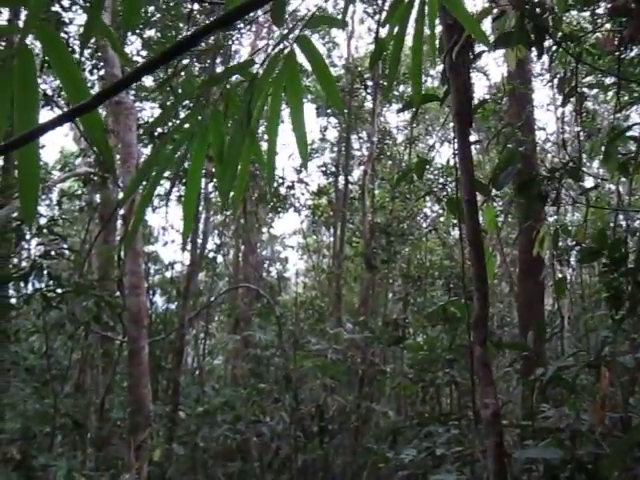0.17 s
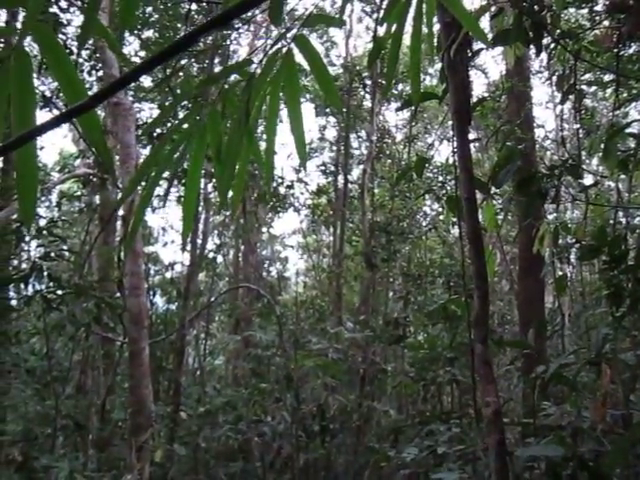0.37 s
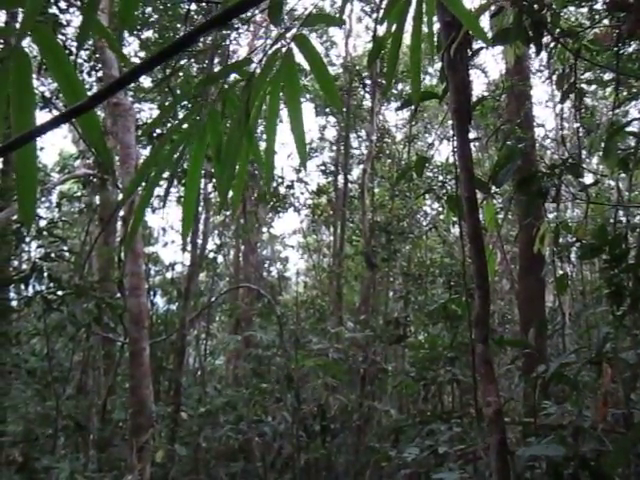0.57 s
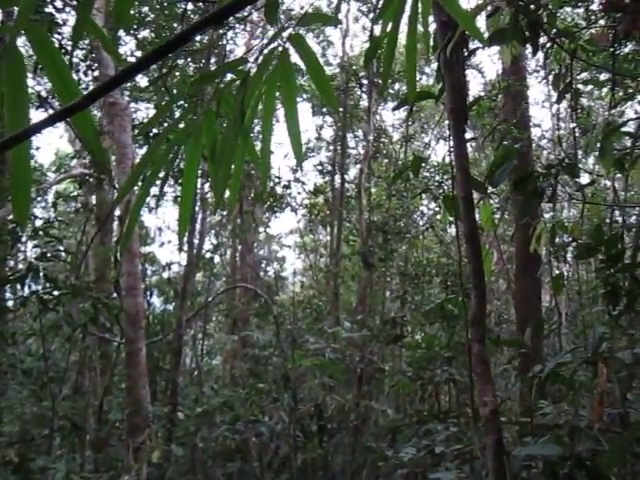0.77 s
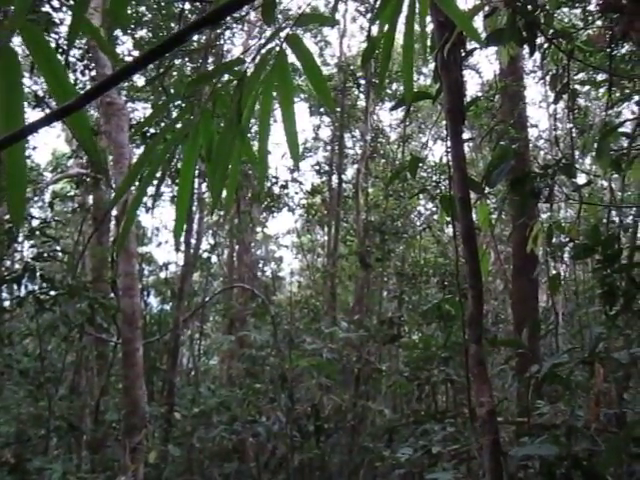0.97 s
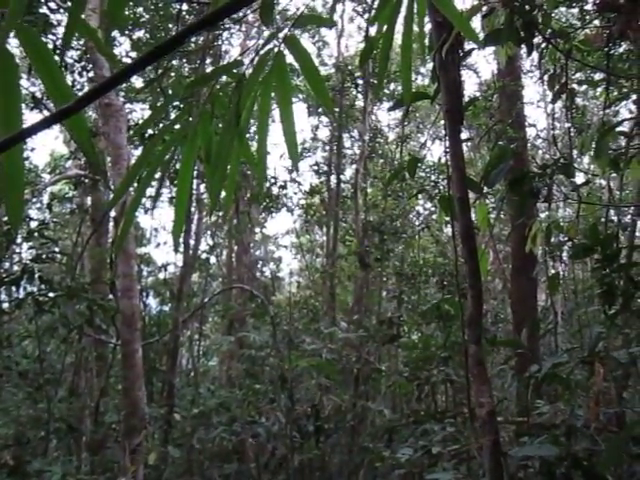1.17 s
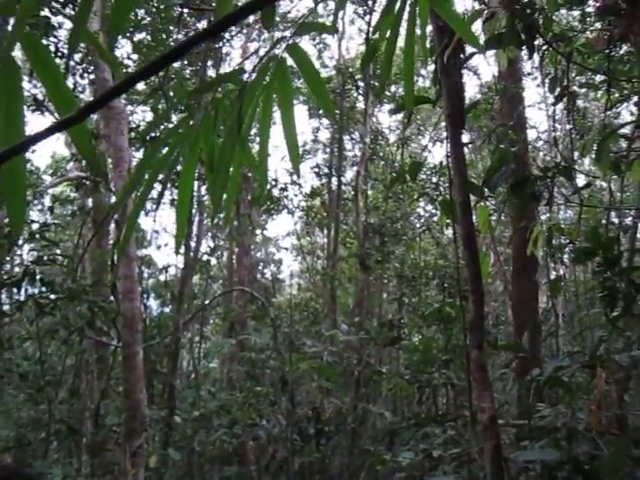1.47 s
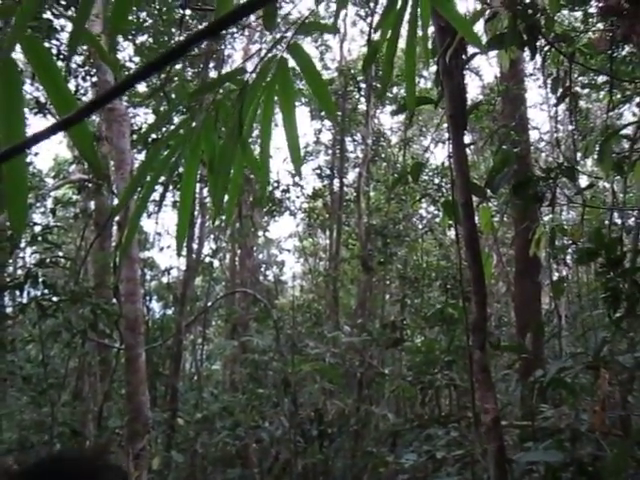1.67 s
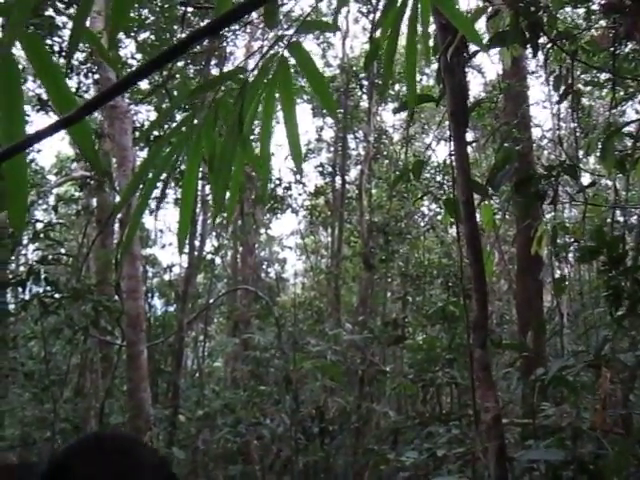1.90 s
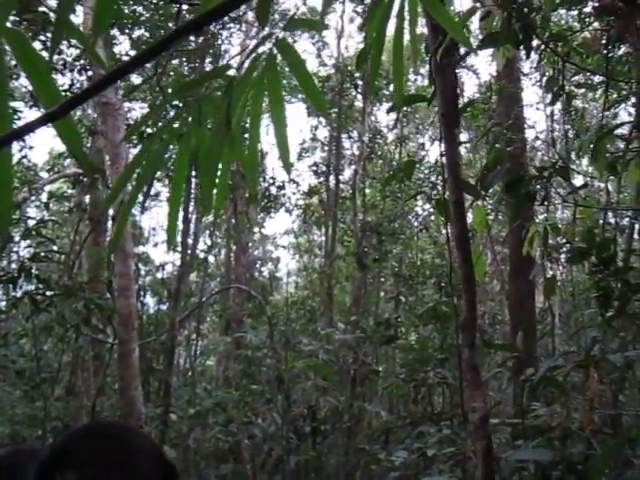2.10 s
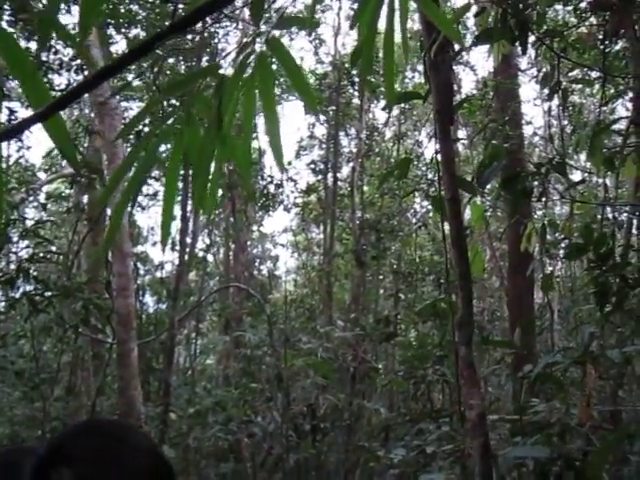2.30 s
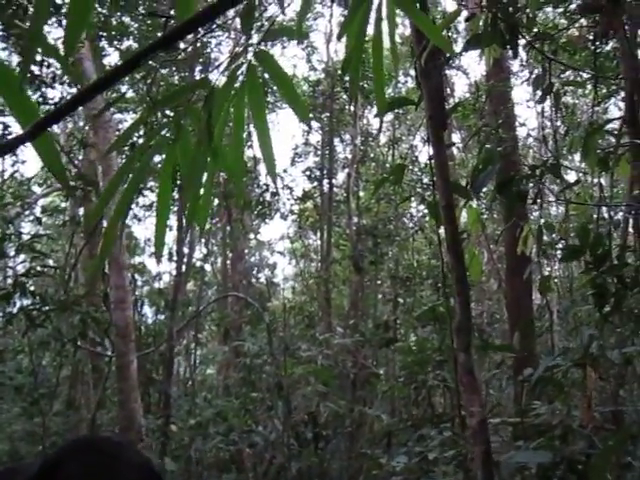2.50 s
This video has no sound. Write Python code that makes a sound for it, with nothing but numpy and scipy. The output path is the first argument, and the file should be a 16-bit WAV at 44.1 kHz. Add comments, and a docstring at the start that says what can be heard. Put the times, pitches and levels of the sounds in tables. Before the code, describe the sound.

A gibbon whoops repeatedly in a tropical forest while nearby leaves rustle and twigs crackle.

```python
"""Gibbon whooping in a tropical forest

A gibbon whoops again and again: each near-pure note slides up, holds, and rings on as the trunks
scatter it. Far whistles answer and insects hiss in narrow bands of noise. Close by, leaves rustle
with many tiny contacts, twigs crackle, and wood and ground give soft, quickly damped knocks.
Under it all lies a low rumble of air."""
import sys
import numpy as np
from scipy import signal
from scipy.fft import rfft, irfft
from scipy.io import wavfile
from scipy.ndimage import uniform_filter1d

SR = 44100
rng = np.random.default_rng(int(sys.argv[2]) if len(sys.argv) > 2 else 0)


def int16_out(signal):
    """Quantize to a 16-bit WAV file."""
    q = np.round(np.clip(np.atleast_2d(signal).T, -1, 1) * 32767)
    wavfile.write(sys.argv[1], SR, q.astype(np.int16))


N = 116865


def undb(db):
    """Amplitude ratio of a level in decibels."""
    return 10 ** (np.asarray(db) / 20)


def unit(x):
    """Normalisation to rms 1."""
    return x / np.sqrt(np.mean(x ** 2) + 1e-18)


def ramp(u):
    """Raised-cosine step from 0 to 1."""
    return np.sin(np.clip(u, 0, 1) * np.pi / 2) ** 2


def add(out, x, start):
    """Superposition: x joins out at a start time in seconds."""
    i = int(round(start * SR))
    x, i = x[max(-i, 0):], max(i, 0)
    out[i:i + len(x)] += x[:max(len(out) - i, 0)]


def colour(x, points):
    """Spectral shaping: x is filtered by a curve of (Hz, dB) points, at rms 1."""
    hz, db = np.array(points).T
    f = np.fft.rfftfreq(len(x), 1 / SR)
    gain = undb(np.interp(np.log(f + 1), np.log(hz), db))
    return unit(irfft(rfft(x) * gain, len(x)))


def band(size, hz, width_hz):
    """Resonance: white noise through one steep peak, at rms 1."""
    f = np.fft.rfftfreq(size, 1 / SR) + 1
    detuning = (f - hz * hz / f) / width_hz
    return unit(irfft(rfft(rng.standard_normal(size)) / (1 + detuning ** 2), size))


def forest(x, echo_db, early_t60_s=0.66, late_t60_s=1.99, slap_s=0.135, smooth_s=0.14):
    """Reverberation by scattering: near trunks return a short decay, far ones a long tail."""
    t = np.arange(len(x)) / SR
    early, late = undb(4.5 - 60 * t / early_t60_s), undb(-60 * t / late_t60_s)
    slap = undb(2.5) * np.exp(-((t - slap_s) / 0.008) ** 2)  # stronger return from a stand of trees
    decay = (early + late) * ramp(t / 0.013) + slap
    decay = undb(echo_db) * decay / np.linalg.norm(decay)
    heard = x + signal.fftconvolve(x, rng.standard_normal(len(x)) * decay)[:len(x)]
    # The quick flutter stays, while the smoothed power follows an even decay.
    even_power = x ** 2 + signal.fftconvolve(x ** 2, decay ** 2)[:len(x)]
    smooth = lambda p: np.abs(uniform_filter1d(p, int(smooth_s * SR), mode="constant")) + 1e-12
    return unit(heard * np.sqrt(smooth(even_power) / smooth(heard ** 2))) * x.std()


# Spectrum of the air (frequency [Hz], relative spectral level [dB])
AIR_SPECTRUM = [(15, -0.5), (30, -2), (60, -6), (120, -12.5), (220, -17), (500, -22.5), (900, -23.5),
                (2000, -28), (3000, -28.5), (4500, -32), (6500, -38.5), (10000, -40.5), (13000, -45.5),
                (16000, -52.5)]


def air(level_db=-48):
    """Broadband ambient noise: a low rumble falling away into the even hiss of the forest."""
    return undb(level_db) * colour(rng.standard_normal(N), AIR_SPECTRUM)


# Insect buzzes (start [s], duration [s], centre [Hz], width [Hz], sweep rate [Hz/s], level [dB])
INSECT_BUZZES = [(-.1, 0.49, 5300, 300, -4.5, -64.5), (2.49, .3, 3630, 380, 1906, -53.5)]


def insects(fade_s=0.1):
    """Narrow-band noise: each buzz swells and fades as a linear frequency shift moves its centre."""
    out, t = np.zeros(N), np.arange(SR) / SR
    for start, length, hz, width, rate, db in INSECT_BUZZES:
        sweep = np.exp(1j * np.pi * rate * t ** 2)
        buzz = np.real(signal.hilbert(band(SR, hz, width)) * sweep)
        add(out, undb(db) * buzz * ramp(t / fade_s) * ramp((length - t) / fade_s), start)
    return out


# Distant notes (start [s], frequency [Hz], duration [s], relative level [dB])
FAR_WHISTLES = [(1.07, 1465, 0.076, -55.5), (1.18, 1822, 0.097, -58.5), (1.29, 1400, 0.15, -55.5),
                (1.57, 1476, 0.079, -53.5), (2.1, 1779, 0.076, -57)]


def far_whistles(echo_db=3):
    """Pure tones from deep in the forest, where the reverberant field outweighs the direct sound."""
    out, t = np.zeros(N), np.arange(SR) / SR
    for start, hz, length, db in FAR_WHISTLES:
        envelope = np.sin(np.pi * np.clip(t / length, 0, 1))
        note = envelope * np.sin(2 * np.pi * hz * t)
        add(out, 2 * undb(db) * forest(note, echo_db), start)
    return out


# Spectrum of brisk rustling (frequency [Hz], relative spectral level [dB])
LEAF_SPECTRUM = [(300, -2), (1500, 1), (4000, 1), (6500, -5), (10000, -5.5), (13000, -10.5), (16000, -21)]
# Rustle of the moving foliage (time [s], level [dB])
RUSTLE_LEVELS = [(0, -64.5), (.86, -67), (.93, -54), (1.12, -61), (1.17, -51), (1.29, -49), (1.53, -51.5),
                 (1.64, -58), (1.82, -63.5), (1.95, -56.5), (2.1, -54), (2.198, -56), (2.29, -51.5),
                 (2.39, -51), (2.5, -56.5), (2.65, -57.5)]


def leaves(ticks_per_s=5000, dull_hz=9000, brisk_db=-53, surge_hz=22, surge_db=2.6):
    """Friction noise: leaves brush in a surging swish of tiny ticks, brighter as they move faster."""
    ticks = (rng.random(N) < ticks_per_s / SR) * rng.standard_normal(N)
    ticks *= undb(2.5 * np.minimum(rng.exponential(size=N), 4))  # a few stand out
    swish = undb(-1.5) * rng.standard_normal(N)
    bright = colour(unit(ticks) + swish, LEAF_SPECTRUM)
    dull = signal.sosfiltfilt(signal.butter(1, dull_hz, fs=SR, output="sos"), bright)
    db = np.interp(np.arange(N) / SR, *np.array(RUSTLE_LEVELS).T)
    brightness = np.minimum(undb(db - brisk_db), 1)
    surges = surge_db * band(N, surge_hz, 2 * surge_hz)
    return (dull + brightness * (bright - dull)) * undb(db + surges)


# Knocks on wood and ground (time [s], level [dB], centre [Hz], width [Hz], decay time [s])
WOOD_KNOCKS = [(1.018, -39.5, 594, 504.5, 0.0095), (1.36, -43.5, 407, 90, 0.012),
               (1.648, -54, 650, 396, .007), (1.85, -39, 960, 650, 0.0073), (1.995, -44.5, 500, 596, .01)]
# Leaf and twig crackles (time [s], level [dB], centre [Hz], width [Hz], decay time [s])
TWIG_CRACKLES = [(.922, -49.5, 1790, 703, .008), (1.02, -52, 3240, 1190, 0.0071),
                 (1.038, -44, 2600, 800, 0.0069), (1.139, -51, 6760, 8000, 0.0088),
                 (1.159, -45, 5760, 8200, 0.03), (1.18, -37, 7900, 8000, 0.0051),
                 (1.218, -42.5, 7560, 8000, 0.01), (1.247, -55, 6000, 4030, 0.0038),
                 (1.356, -40, 9600, 7000, 0.0039), (1.399, -41.5, 3950, 3930, 0.0067),
                 (1.49, -50, 5950, 2500, 0.0039), (1.498, -33.5, 4240, 1500, 0.0032),
                 (1.557, -40.5, 3600, 4150, 0.0099), (1.691, -36.5, 8250, 9520, 0.003),
                 (1.733, -42, 6400, 8000, 0.0032), (1.851, -42.5, 2400, 2240, .005),
                 (1.991, -49.5, 5400, 5060, 0.0073), (2.035, -38.5, 1700, 600, 0.0032),
                 (2.065, -50.5, 2200, 3100, 0.061), (2.321, -37.5, 3950, 5500, 0.0043),
                 (2.365, -60, 9000, 7000, 0.032), (2.4, -54, 8000, 8350, 0.015),
                 (2.451, -39.5, 8900, 8900, 0.0033)]


def snaps(table, attack_s, tail_db, tail_s, cutoff_hz=14000):
    """Damped resonance: each sudden burst decays exponentially and leaves a faint scattered tail."""
    out, t = np.zeros(N), np.arange(SR // 2) / SR
    for start, db, hz, width, decay in table:
        envelope = ramp(t / attack_s) * (np.exp(-t / decay) + undb(tail_db) * np.exp(-t / tail_s))
        add(out, undb(db) * envelope * band(len(t), hz, width), start)
    return signal.sosfilt(signal.butter(1, cutoff_hz, fs=SR, output="sos"), out)


# Harmonics of the voice, fundamental first (relative level [dB], delay [s], attack [s],
# share of the opening time added to the attack [1], swell [dB/s], echo offset [dB])
VOICE_HARMONICS = [(2, -0.0098, 0.091, 0, 0.5, -2), (-15.5, 0.015, 0.014, 0, -40, -1),
                   (-12, 0.034, 0.0089, 0.6, -1.5, -1), (-27, 0.009, .01, 0.46, 8.5, 9),
                   (-38, .04, .01, 0.22, -2, 6.5), (-53, .05, .01, .8, -2, 0.5)]
# Whoops (start [s], held pitch [Hz], duration [s], level [dB], forest echo [dB], opening time [s],
# emphasis of harmonic 2 [dB], of harmonic 3 [dB], of harmonic 4 [dB])
GIBBON_WHOOPS = [(-.38, 1232, 0.15, -20.5, 1, 0.043, 0, -0.38, -4.3),
                 (.208, 1214, .22, -22.5, -2.4, 0.13, -0.88, -1.6, -2.3),
                 (0.796, 1209, 0.2, -24.5, -2.8, 0.13, 0.93, 0.69, -0.52),
                 (1.414, 1182, .225, -24, -3.1, 0.27, -1.6, -0.59, 1.2),
                 (2.043, 1192, 0.244, -26, 0.25, 0.12, -0.74, -3, -1.3)]


def gibbon(scoop_hz=169.7, rise_s=0.1, sag_hz=30, sag_s=0.072, release_s=0.036):
    """Harmonic series on a pitch that slides up, holds and sags; overtones enter as the voice opens."""
    out, t = np.zeros(N), np.arange(2 * SR) / SR
    for start, hz, length, db, echo_db, opening, *emphasis in GIBBON_WHOOPS:
        scoop = scoop_hz * np.clip(1 - t / rise_s, 0, 1) ** 1.7
        sag = sag_hz * ramp((t - length) / sag_s + 0.5)
        waver = 1 + 0.004 * band(len(t), hz=6.36, width_hz=33)
        phase = 2 * np.pi * np.cumsum((hz - scoop - sag) * waver) / SR
        release = ramp((length - t) / release_s + 0.5)
        emphasis_db = dict(enumerate(emphasis, 2))
        for k, (harmonic_db, delay, attack, share, swell, echo_offset) in enumerate(VOICE_HARMONICS, 1):
            onset = ramp((t - delay) / (attack + share * opening))
            partial = np.sqrt(2) * onset * undb(swell * t) * release * np.sin(k * phase)
            gain = undb(db + harmonic_db + emphasis_db.get(k, 0))
            add(out, gain * forest(partial, echo_db + echo_offset), start)
    return out


def scene():
    """Linear superposition of all sources at one listening point."""
    near = leaves() + snaps(TWIG_CRACKLES, attack_s=0.00044, tail_db=-23.5, tail_s=0.14)
    near += snaps(WOOD_KNOCKS, attack_s=0.0026, tail_db=-34, tail_s=0.021)
    return (gibbon() + far_whistles() + insects() + near + air())[None]


def record(dry, cutoff_hz=15830):
    """Band limiting: a steep low-pass filter removes the highest treble."""
    return signal.sosfilt(signal.ellip(10, 0.2, 80, cutoff_hz, fs=SR, output="sos"), dry)


dry = scene()
out = record(dry)
int16_out(out)
```